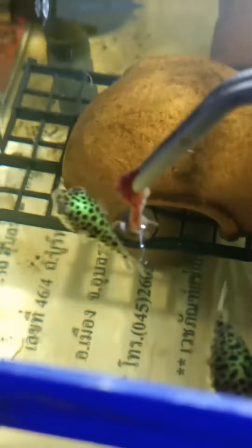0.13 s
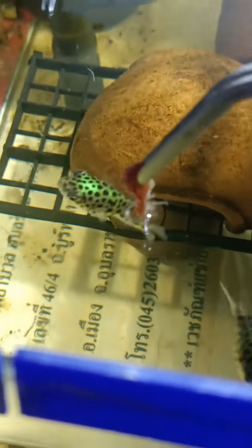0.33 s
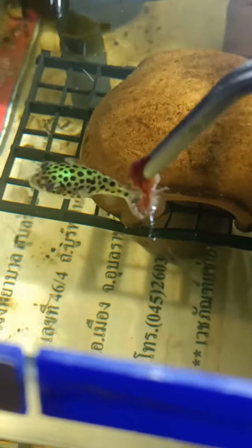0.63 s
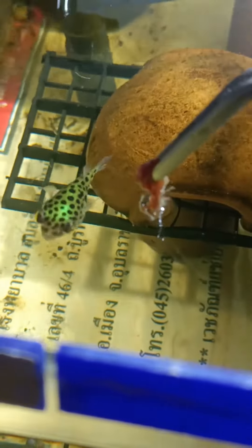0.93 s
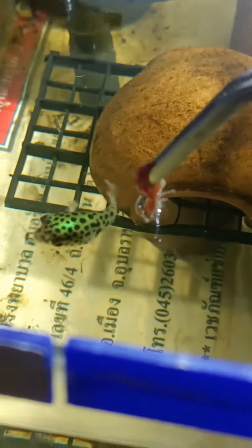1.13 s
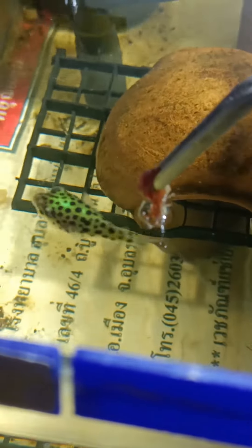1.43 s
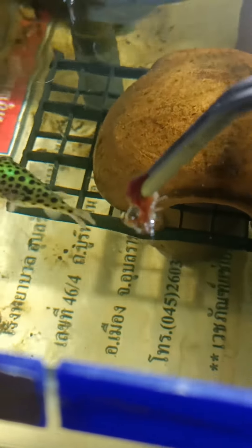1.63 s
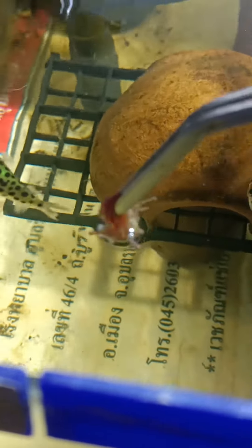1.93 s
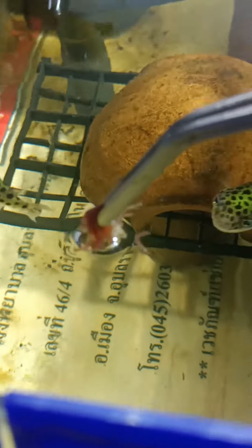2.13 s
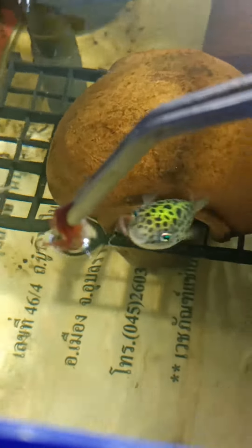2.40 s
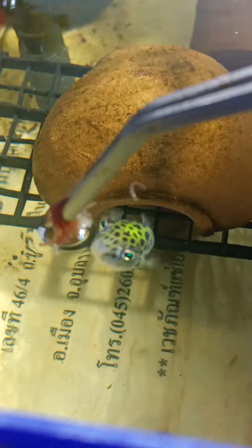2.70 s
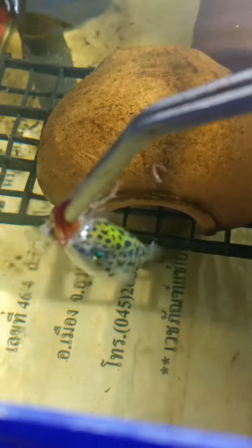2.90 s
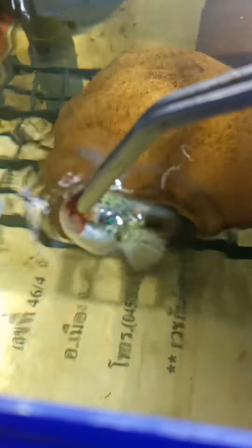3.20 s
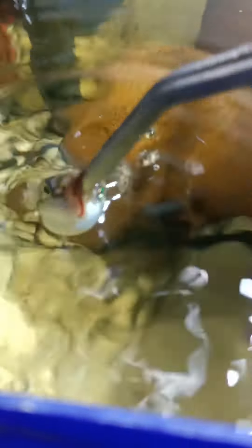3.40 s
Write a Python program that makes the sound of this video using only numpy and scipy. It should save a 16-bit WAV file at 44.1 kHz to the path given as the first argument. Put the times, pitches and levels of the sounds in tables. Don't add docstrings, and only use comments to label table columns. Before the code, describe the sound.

Steady stereo tank noise of low rumble, motor hum, airy hiss and a thin beating whine, with tiny drips; then a fish bites in quick sharp clicks and plops, heard close on a phone indoors.

```python
import sys
import numpy as np
from scipy import signal
from scipy.fft import rfft, irfft, next_fast_len
from scipy.io import wavfile

SR = 44100
rng = np.random.default_rng(int(sys.argv[2]) if len(sys.argv) > 2 else 0)


def store_pcm(level_fs):
    pcm = np.round(np.clip(level_fs, -1, 1) * 32767).astype(np.int16)
    wavfile.write(sys.argv[1], SR, np.atleast_2d(pcm).T)


def decibels_to_gain(level_db):
    exponent = np.asarray(level_db, float) / 20
    return 10 ** exponent


N = 156555
T = np.arange(N) / SR
SIZE = next_fast_len(N + 8192)
HZ = np.maximum(np.arange(SIZE // 2 + 1) * SR / SIZE, 1)
SPRAY_BAND_HZ = [6400, 11300]


# [t/s, peak level/dB, t60/s]
SNAPS = [
    (3.1342, -28, .011),
    (3.2232, -39, .010),
    (3.2245, -28, .008),
    (3.2318, -33, .014),
    (3.2350, -25, .011),
]


def snaps():
    click_gain, click_delay_s = 2.1, .0004
    out = bursts(SNAPS) * splash_noise()
    for s, db, _ in SNAPS:
        out[:, int((s + click_delay_s) * SR)] += click_gain * decibels_to_gain(db)
    return decibels_to_gain(-3) * band(out, SPRAY_BAND_HZ)


# [t/s, peak level/dB, t60/s]
SPRAY = [(3.144, -44, .012), (3.168, -48, .006), (3.2505, -50, .01), (3.292, -52, .015), (.530, -51, .04),
         (.285, -57, .03), (1.265, -54, .015), (1.64, -54, .02), (2.303, -51, .02), (2.755, -51, .03),
         (3.04, -56, .06)]


def spray():
    return band(bursts(SPRAY) * splash_noise(), SPRAY_BAND_HZ)


# [t/s, peak level/dB, f/Hz, t60/s]
BUBBLES = [(3.1408, -32, 2550, .013), (3.143, -43, 3500, .012), (3.232, -42, 3600, .012),
           (3.2947, -35, 2950, .012), (3.2955, -32, 2450, .018), (3.2958, -38, 1850, .020),
           (3.312, -39, 1900, .045), (3.2335, -38, 5350, .025), (3.2345, -37, 7100, .025),
           (3.2328, -40, 9700, .03), (3.2248, -43, 9500, .015), (.531, -49, 4400, .014),
           (1.262, -43, 4500, .012), (1.641, -49, 4500, .01)]


def bubbles():
    attack_s, rise_per_t60, pan_db = .0008, .05, 3.0
    out = np.zeros(N)
    for s, db, hz, t60 in BUBBLES:
        age = np.maximum(T - s, 0)
        envelope = (1 - np.exp(-age / attack_s)) * decibels_to_gain(db - 60 * age / t60)
        cycles = hz * age * (1 + rise_per_t60 * age / t60)
        out += envelope * np.sin(2 * np.pi * cycles)
    return out * decibels_to_gain(pan_db * np.array([[1], [-1]]))


# [t/s, peak level/dB, t60/s]
SLOSH = [
    (3.139, -50, .02),
    (3.2945, -44, .05),
    (3.311, -45, .07),
]


def slosh():
    return band(bursts(SLOSH, tail_db=-28) * splash_noise(), [1400, 3200])


# [t/s, peak level/dB, t60/s]
DRIPS = [
    (.283, -50, .04),
    (.529, -45, .05),
    (1.263, -49, .02),
    (1.64, -47, .025),
    (3.2318, -40, .02),
    (3.1345, -46, .015),
]


def drips():
    return band(bursts(DRIPS, tail_db=-29) * splash_noise(), [3600, 5800])


# [t/s, f/Hz]
WHINE = [(0, 5646), (.42, 5647), (.6, 5636), (.82, 5648), (1.1, 5645), (1.27, 5634), (1.5, 5646),
         (1.75, 5642), (1.95, 5634), (2.2, 5647), (2.5, 5643), (2.72, 5633), (3.0, 5645), (3.3, 5636),
         (3.55, 5640)]
# [start t/s, end t/s, level/dB]
RIGHT_SWELLS = [(-.1, .136, -58.5), (.14, .22, -58.5), (.25, .35, -59), (.35, .46, -58.5), (.51, .66, -59),
                (.65, .78, -57.5), (.81, .9, -54.5), (.94, 1.0, -64), (1.03, 1.13, -61), (1.19, 1.3, -55.5),
                (1.33, 1.41, -58.5), (1.43, 1.5, -56.5), (1.5, 1.57, -63), (1.64, 1.71, -58.5),
                (1.71, 1.78, -63), (1.86, 1.96, -57.5), (1.95, 2.12, -56.5), (2.14, 2.2, -56),
                (2.21, 2.3, -68), (2.36, 2.53, -61.5), (2.62, 2.8, -55.5), (2.87, 3, -63),
                (3.1, 3.19, -63.5), (3.2, 3.24, -67), (3.29, 3.36, -63), (3.38, 3.44, -63),
                (3.47, 3.53, -65)]
# [start t/s, end t/s, level/dB]
LEFT_SWELLS = [(.14, .26, -55), (.3, .35, -59), (.44, .56, -55), (.55, .72, -55), (.88, .99, -53),
               (1.1, 1.24, -53), (1.33, 1.47, -54), (1.55, 1.7, -57), (1.78, 2.0, -55), (2.09, 2.16, -56),
               (2.24, 2.32, -58), (2.6, 2.83, -55), (2.87, 2.93, -58), (3.13, 3.3, -55), (3.45, 3.55, -60)]
# [start t/s, end t/s, level/dB]
OCTAVE_SWELLS = [(0, .09, -74), (.11, .18, -77), (.24, .43, -69), (.77, .88, -67), (1.0, 1.12, -72),
                 (1.23, 1.31, -75), (1.42, 1.6, -79), (1.72, 1.77, -73), (1.89, 2.08, -70),
                 (2.1, 2.32, -70), (2.32, 2.54, -68), (2.68, 2.83, -76), (2.95, 3.1, -71)]


def whine():
    wobble_hz, fade_db = 2, 1.2
    phase = 2 * np.pi * np.cumsum(in_time(WHINE) + wobble_hz * drift(8)) / SR
    fade_left, fade_right, fade_octave = [decibels_to_gain(fade_db * drift(15)) for _ in range(3)]
    left = fade_left * swells(LEFT_SWELLS, base_db=-64) * np.cos(phase)
    right = fade_right * swells(RIGHT_SWELLS, base_db=-75) * np.sin(phase)
    octave = fade_octave * swells(OCTAVE_SWELLS, base_db=-81) * np.sin(2 * phase)
    return np.array([left, right]) + octave + second_whine()


def second_whine():
    hz, width_hz, level_db, pan_db = 5420, 14, -75.5, -1
    resonance = 1 / (1 + (2 * (HZ - hz) / width_hz) ** 2)
    pan = decibels_to_gain(pan_db * np.array([[-1], [1]]))
    return decibels_to_gain(level_db) * pan * rms_one(to_time(room_noise(resonance)))


# [f/Hz, level/dB rms, width/Hz]
HUM = [(179.1, -57.5, 31), (203.5, -74.5, 26), (272.6, -62, 14), (296, -63.5, 14.4), (402.7, -56.5, 12.5),
       (448.7, -59.5, 8.4), (509.5, -67, 3.9), (587.8, -60.5, 14.5), (658, -88, 5.5), (702.4, -63.5, 3.8),
       (800, -76, 5.6), (909, -64, 49)]


def hum():
    gain = 0
    for hz, db, width_hz in HUM:
        gain = gain + decibels_to_gain(db) / np.sqrt(width_hz) / (1 + (2 * (HZ - hz) / width_hz) ** 2)
    return to_time(room_noise(gain)) * np.sqrt(SR / 1.6)


# [f/Hz, level/dB per Hz]
HISS = [(250, -7.5), (420, -1), (800, -7.5), (1150, -7), (1500, -4.5), (2350, -9), (3100, -20), (5000, -25)]


def hiss():
    hiss_db, trickle_db, ticks_per_s = -44, -69, 130
    gain = decibels_to_gain(at_hz([(60, -5), *HISS, (16500, -37)], HZ))
    air = patchy(room_noise(gain), patchy_db=0.8, shared=0.33)
    tick_level = decibels_to_gain(1.2 * np.minimum(rng.exponential(1, N), 3))
    ticks = (rng.random(N) < ticks_per_s / SR) * tick_level
    puffs = signal.lfilter([1], [1, -.985], ticks) * rng.standard_normal((2, N))
    return decibels_to_gain(hiss_db) * air + decibels_to_gain(trickle_db) * rms_one(band(puffs, SPRAY_BAND_HZ))


# [t/s, level/dB]
SWELL = [(0.4, -44), (.9, -44), (1.17, -40), (1.6, -41), (1.78, -41), (2.07, -40), (2.29, -45),
         (2.39, -42.5), (2.45, -45), (2.56, -41), (2.65, -48), (2.86, -43), (2.98, -49.5), (3.12, -43.5),
         (3.3, -46), (3.4, -43.5), (3.55, -46.5)]
# [f/Hz, level/dB per Hz]
RUMBLE = [(20, -14), (33, -6.5), (52, -16.5), (84, -4), (104, -13.5), (190, -1), (290, -7), (345, -20)]


def rumble():
    gain = decibels_to_gain(at_hz([*RUMBLE, (500, -74)], HZ))
    return decibels_to_gain(in_time(SWELL) - 0.5) * rms_one(to_time(room_noise(gain)))


# [f/Hz, correlation/-1..1]
LIKENESS = [(60, 1), (110, 0.78), (200, 0.97), (380, 0.61), (700, 0.44), (1290, -0.22), (2380, -0.00069),
            (4400, -0.32)]


def room_noise(gain):
    mid, side = rfft(rng.standard_normal((2, SIZE)))
    alike = np.clip(at_hz(LIKENESS, HZ), -.99, .99)
    return gain * (np.sqrt(1 + alike) * mid + np.sqrt(1 - alike) * side * np.array([[1], [-1]]))


def patchy(spectrum, patchy_db, shared):
    together = drift(9)
    place = np.clip(2 * np.log2(HZ / 250), 0, 12)
    out = 0
    for k in range(13):
        share = np.clip(1 - abs(place - k), 0, 1)
        flicker_db = patchy_db * (shared * together + drift(4.4))
        out = out + to_time(spectrum * share) * decibels_to_gain(flicker_db)
    return rms_one(out)


def splash_noise():
    return .8 * rng.standard_normal(N) + .8 * rng.standard_normal((2, N))


def bursts(rows, tail_db=-26):
    attack_s, tail_t60_s = .00023, .18
    envelope = np.zeros(N)
    for s, db, t60 in rows:
        age = np.maximum(T - s, 0)
        decay = decibels_to_gain(db - 60 * age / t60)
        tail = decibels_to_gain(db + tail_db - 60 * age / tail_t60_s)
        envelope += (1 - np.exp(-age / attack_s)) * (decay + tail)
    return envelope


def swells(rows, base_db):
    spill_s = .022
    power = decibels_to_gain(base_db) ** 2
    for start, end, db in rows:
        place = np.clip((T - start + spill_s) / (end - start + 2 * spill_s), 0, 1)
        power = power + decibels_to_gain(db) ** 2 * np.sin(np.pi * place) ** 2
    return np.sqrt(2 * power)


def drift(rate_hz):
    r = np.exp(-80 * np.pi * rate_hz / SR)
    slow = signal.lfilter([1], [1, -2 * r, r * r], rng.standard_normal(N // 40 + 2002))[2000:]
    return np.interp(np.arange(N) / 40, np.arange(len(slow)), rms_one(slow - slow.mean()))


def band(x, edges_hz):
    return signal.sosfilt(signal.butter(2, edges_hz, "band", fs=SR, output="sos"), x)


def to_time(spectrum):
    return irfft(spectrum, SIZE)[:, :N]


def rms_one(x):
    return x / np.sqrt(np.mean(x ** 2) + 1e-20)


def in_time(rows):
    s, value = np.transpose(rows)
    return np.interp(T, s, value)


def at_hz(points, hz):
    point_hz, db = np.transpose(points)
    return np.interp(np.log(hz), np.log(point_hz), db)


def scene():
    water = snaps() + spray() + bubbles() + slosh() + drips()
    return water + whine() + hum() + hiss() + rumble()


def port(colour):
    cepstrum = irfft(np.log(decibels_to_gain(at_hz(colour, HZ))), SIZE)
    fold = np.where(np.arange(SIZE) < SIZE // 2, 2., 0.)
    fold[0] = 1
    return np.exp(rfft(cepstrum * fold))


def top_cut(x):
    return signal.sosfilt(signal.butter(12, 16220, fs=SR, output="sos"), x)


# [f/Hz, level/dB]
PORT_LEFT = [(1300, 0.64), (2200, -5.5), (5200, -2), (6600, -28), (7800, -2), (9700, 12), (11000, 4.5),
             (15000, 0.5)]
PORT_RIGHT = [(1000, 0.96), (2000, 2), (5000, 5.5), (7200, 8), (8500, -13), (10200, -56), (12500, 2),
              (15200, -0.5)]


def record(dry):
    cutoff_hz, bass_cut_hz, left_bass_db = 15530, 22, -1.6
    start_gain_db, step_s, step_length_s = 3.0, .345, .0034
    limits = (HZ < cutoff_hz) / (1 + (bass_cut_hz / HZ) ** 2)
    left_bass = decibels_to_gain(left_bass_db / (1 + (HZ / 110) ** 4))
    ports = np.array([left_bass * port(PORT_LEFT), port(PORT_RIGHT)])
    mix = to_time(rfft(dry, SIZE) * limits * ports)
    mix = mix * decibels_to_gain(start_gain_db * np.clip((step_s - T) / step_length_s, 0, 1))
    return top_cut(mix)


dry = scene()
out = record(dry)
store_pcm(out)
```